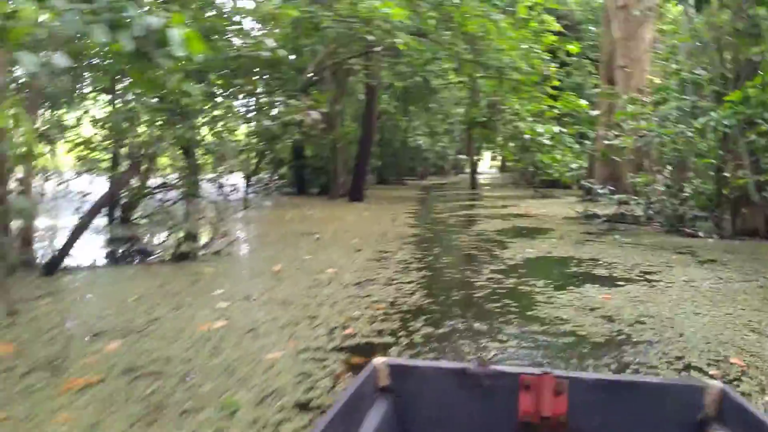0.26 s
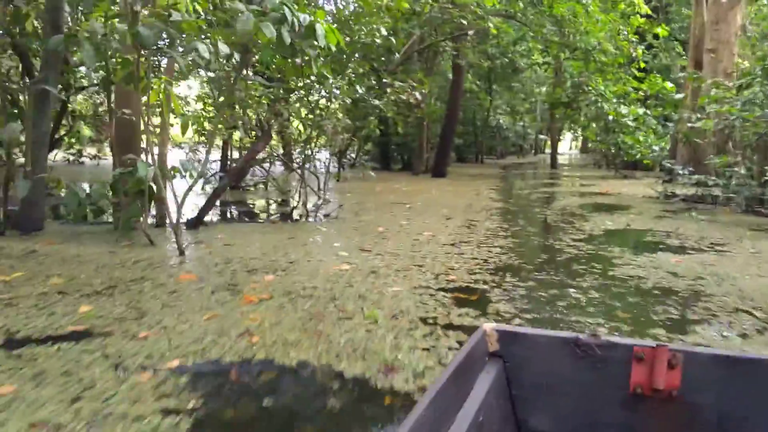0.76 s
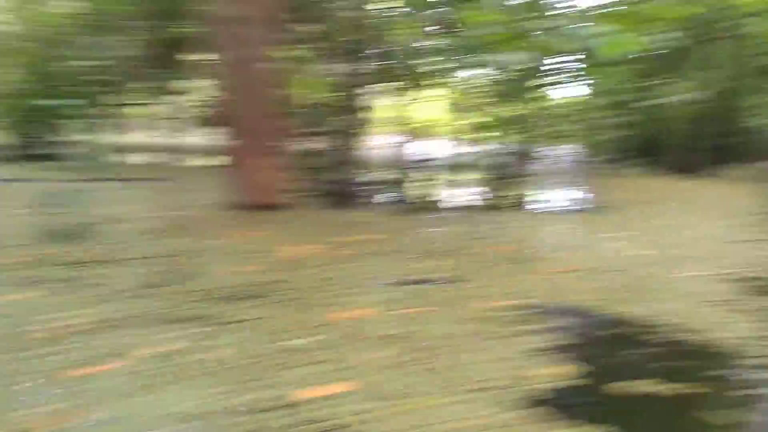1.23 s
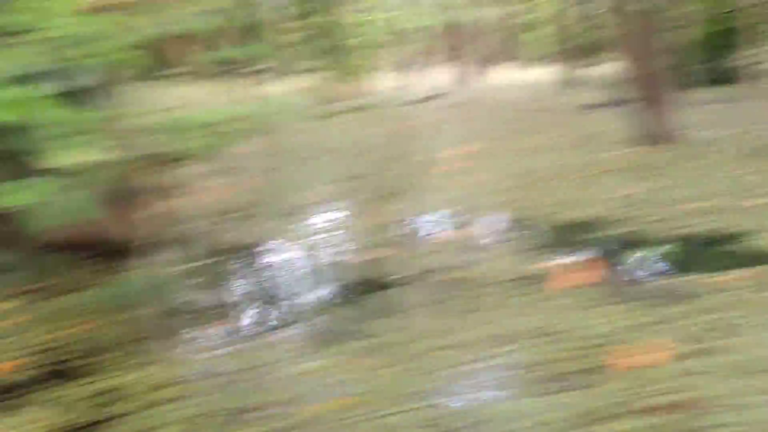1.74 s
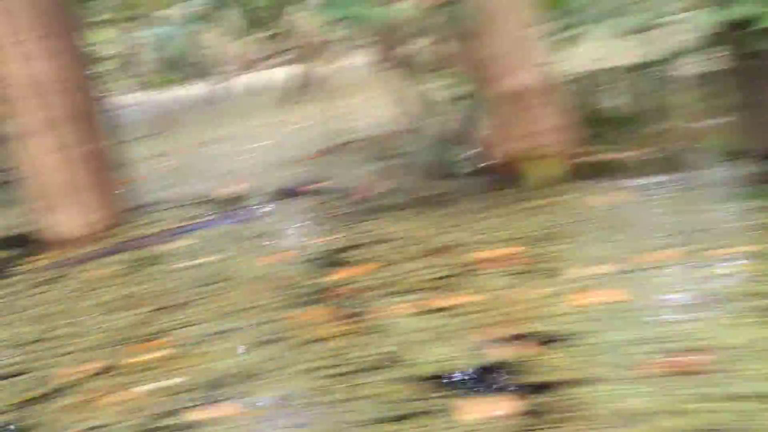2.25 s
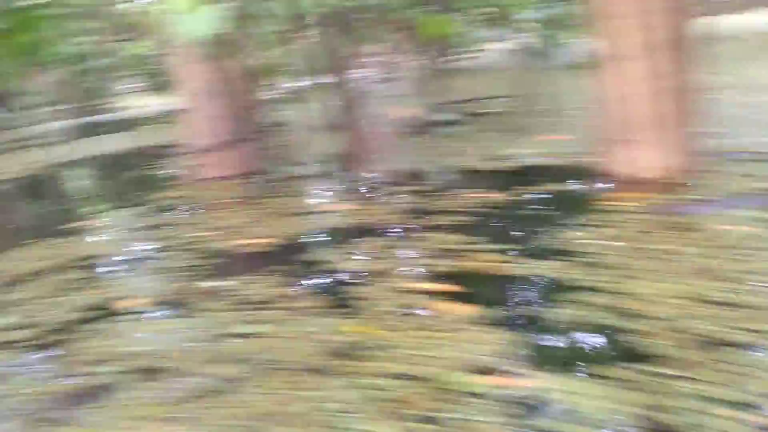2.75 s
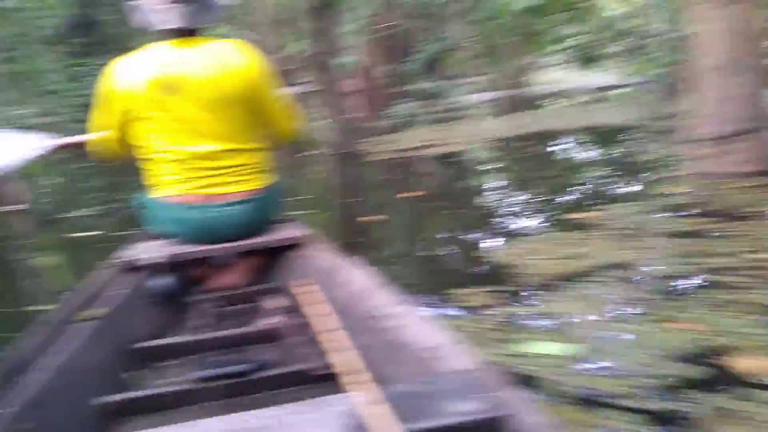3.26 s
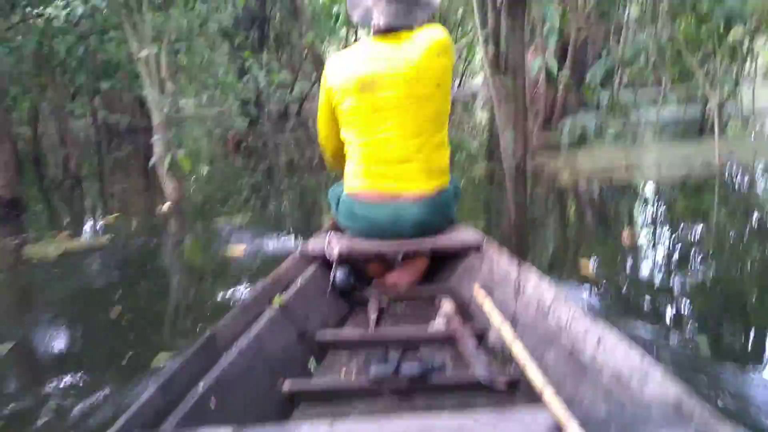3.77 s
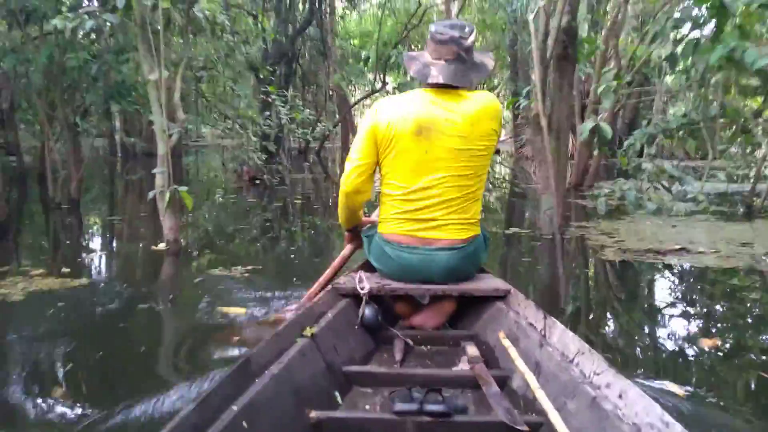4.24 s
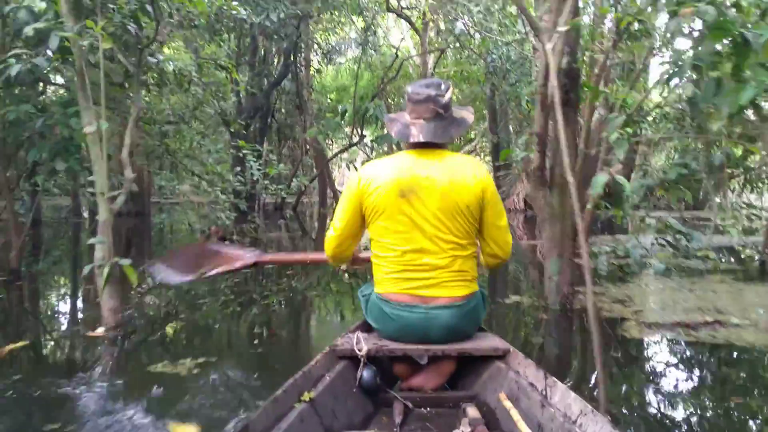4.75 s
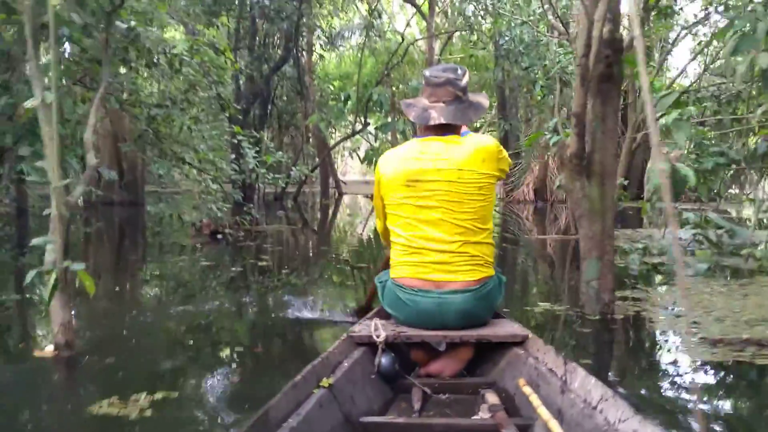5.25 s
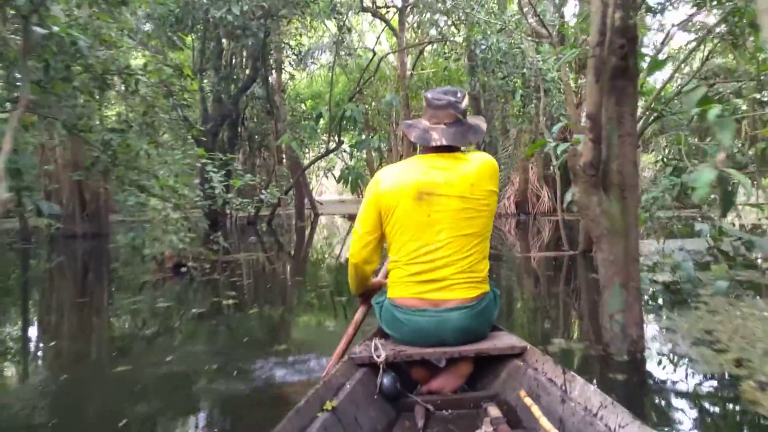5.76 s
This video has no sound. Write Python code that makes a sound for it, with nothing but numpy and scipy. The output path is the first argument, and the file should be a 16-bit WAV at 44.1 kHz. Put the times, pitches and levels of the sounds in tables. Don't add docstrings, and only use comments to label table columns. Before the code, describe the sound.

Water gurgles and drips around a paddled canoe under a steady high cicada drone, with handling taps and two woody knocks.

```python
import sys
import numpy as np
from scipy import signal
from scipy.fft import rfft, irfft, next_fast_len
from scipy.io import wavfile
from scipy.ndimage import uniform_filter1d, map_coordinates

SR = 44100
rng = np.random.default_rng(int(sys.argv[2]) if len(sys.argv) > 2 else 0)


def amplitude_ratio(level_db):
    exponent = np.asarray(level_db, float) / 20
    return 10 ** exponent


def unload_audio(sound):
    columns = np.transpose(np.atleast_2d(sound))
    steps = np.round(np.clip(columns, -1, 1) * 32767)
    wavfile.write(sys.argv[1], SR, steps.astype(np.int16))


N = 264644
TIME = np.arange(N) / SR

# start_s, stir_db, froth_db
STIR = [(0, -53, -56.5), (.3, -46, -61.5), (.45, -51.5, -59), (.82, -48, -57.5), (1, -51.5, -57.5),
        (1.9, -54.5, -59.5), (2.1, -53, -53.5), (2.6, -51.5, -58.5), (2.8, -45, -48), (3.4, -41, -52.5),
        (3.7, -47, -52), (3.95, -38.5, -51.5), (4.29, -45.5, -58), (4.36, -34, -51.5), (4.6, -47, -48.5),
        (5.08, -49, -54), (5.2, -47, -51.5), (6, -49.5, -56)]
# start_s, peak_db, centre_hz, t60_s
SPLASHES = [(0.27, -34, 5950, 0.023), (0.7911, -49, 6000, 0.026), (0.8573, -31.5, 3430, 0.027),
            (2.0026, -31.5, 2720, 0.18), (2.108, -25, 3100, 0.035), (2.5033, -34, 2760, 0.17),
            (2.7145, -40, 2520, 0.085), (2.8147, -35, 3300, 0.02), (3.125, -29, 3100, 0.029),
            (3.2568, -35, 2890, 0.12), (3.347, -25.5, 5430, 0.023), (3.5143, -35, 3240, 0.037),
            (3.557, -27, 3480, 0.088), (3.579, -31, 9000, .01), (3.657, -34, 9700, .008),
            (3.877, -23.5, 8000, 0.0084), (4.0105, -40, 9000, .008), (5.478, -35, 9000, .008),
            (4.773, -31.5, 3400, 0.054), (5.1682, -26.5, 3370, 0.02), (5.269, -34, 3500, 0.042),
            (5.4676, -44, 5170, 0.05), (5.8394, -37, 3200, 0.03)]


def unit(x):
    return x / np.sqrt(np.mean(x ** 2) + 1e-20)


def along(points, hz):
    f, v = np.transpose(points)
    return np.interp(np.log(hz + 1), np.log(f + 1), v)


def curves(rows, t=TIME):
    s, *cols = np.transpose(rows)
    return [np.interp(t, s, c) for c in cols]


def wobble(rate):
    knots = rng.standard_normal(int(N * rate / SR) + 4)
    return map_coordinates(knots, [TIME * rate])


def swells(floor_db, rows):
    t = TIME[::128]
    bells = sum(amplitude_ratio(2 * db) * np.exp(-((t - s) / half) ** 2) for s, db, half in rows)
    return np.sqrt(amplitude_ratio(2 * floor_db) + np.interp(TIME, t, bells))


def filtered(x, response):
    m = next_fast_len(N + 8192)
    return irfft(rfft(x, m) * response(np.fft.rfftfreq(m, 1 / SR)), m)[..., :N]


def add(ports, s, sound):
    i = round(s * SR)
    ports[:, i:i + sound.shape[-1]] += sound[..., :N - i]


def rush(spectrum, alike, patchy_db, grainy_db):
    unevenness = np.minimum(rng.exponential(1, (2, N)), 5)
    grains = amplitude_ratio(grainy_db * unevenness) * rng.standard_normal((2, N))
    z = signal.stft(grains, nperseg=512)[2]
    field = uniform_filter1d(rng.standard_normal(z.shape[1:]), size=5, axis=0)
    field = unit(uniform_filter1d(field, size=4, axis=1))
    a, b = signal.istft(z * amplitude_ratio(patchy_db * field), nperseg=512)[1][:, :N]
    turn = np.arccos(np.clip(alike, -1, 1)) / 2
    pair = np.cos(turn) * a + np.sin(turn) * np.array([b, -b])
    return unit(filtered(pair, lambda hz: amplitude_ratio(along(spectrum, hz))))


def trees(x):
    # pitch_hz, t60_s
    echo_decay = [(300, 0.1), (2000, 0.88), (8000, 0.024)]
    hz, t, z = signal.stft(rng.standard_normal((2, SR // 2)), SR, nperseg=256)
    fade = amplitude_ratio(-60 * t / along(echo_decay, hz)[:, None])
    tail = signal.istft(z * fade, SR, nperseg=256)[1]
    late = np.pad(x, (600, 0))[None]
    return signal.fftconvolve(late, tail / np.linalg.norm(tail[0]), axes=1)[:, :N]


def bubble(db, hz, t60, rise):
    t = np.arange(SR // 8) / SR
    turns = hz * (t + rise * t * t / t60)
    onset = 1 - np.exp(-t / 0.0018)
    return amplitude_ratio(db - 60 * t / max(t60, .005)) * onset * np.sin(2 * np.pi * turns)


def gulp(db, hz, t60, rise):
    out = bubble(db, hz, t60, rise)
    for late, detune, size in rng.random((4, 3)):
        i = int(late ** 2 * 0.47 * t60 * SR)
        neighbour = bubble(db + 2.5 - 8 * size, hz * 1.56 ** (detune - .4), .5 * t60, rise)
        out[i:] += neighbour[:len(out) - i]
    return out


def cicadas():
    # start_s, level_db
    chorus_level = [(0, -35.5), (1, -35.5), (1.7, -37.5), (2.4, -40.5), (3, -43), (3.33, -40.5),
                    (3.7, -42.5), (4.33, -43), (5, -39), (5.33, -41.5), (5.67, -40), (6, -38.5)]
    # pitch_hz, level_db
    body = [(5200, -80), (5900, -26.5), (6500, -3), (6950, 1), (7300, -0.5), (7550, -8.5), (7800, -45),
            (8600, -93)]
    thin_body = [(8700, -60), (9100, 2), (9300, 0.5), (9500, -10), (9900, -27)]  # pitch_hz, level_db
    chorus_db, = curves(chorus_level)
    gates = 0
    for buckles_hz in (84.5, 128.0, 155, 141):
        turns = np.cumsum(buckles_hz * (1 + 0.048 * wobble(19))) / SR
        gates = gates + np.abs(np.sin(np.pi * turns)) ** 6
    chorus = unit((18.0 + gates) * rush(body, alike=0.55, patchy_db=1.2, grainy_db=-1.2))
    swell = amplitude_ratio(chorus_db - .5 + .7 * wobble(9))
    thin = rush(thin_body, alike=0.075, patchy_db=1.0, grainy_db=0.0)
    thin_db = -51.5 - 11 * np.maximum(TIME - 1.7, 0)
    thin_swell = amplitude_ratio(thin_db - 6 + 0.59 * wobble(7.4))
    return swell * chorus * amplitude_ratio([[0], [-13]]) + thin_swell * thin * amplitude_ratio([[0], [-11]])


def rubs():
    # centre_s, peak_db, half_length_s
    shifts = [(0, -50, 0.026), (0.29, -46.5, 0.089), (.6, -53, 0.29), (1.193, -46.5, 0.069),
              (1.397, -54, 0.065), (1.856, -44, 0.035), (2.08, -46.5, 0.067), (2.4, -52, 0.25),
              (2.6, -53, .04), (2.81, -35.5, 0.051), (2.987, -41.5, 0.037), (3.216, -46.5, .04),
              (3.406, -51, 0.037), (3.848, -22.5, 0.032), (3.973, -25.5, 0.093), (4.228, -27, 0.037),
              (5.31, -52, 0.035), (5.9, -51, 0.064)]
    # pitch_hz, level_db (per Hz)
    skin = [(20, -27), (45, 9), (80, -1), (140, 0), (250, -7), (500, -20.5), (1200, -55)]
    lumps = amplitude_ratio(4.0 * np.array([wobble(5.9), wobble(22.055)]))
    rumble = unit(lumps * rush(skin, alike=.1, patchy_db=5.0, grainy_db=-2.5))
    return swells(-58, shifts) * rumble


def gurgle():
    # pitch_hz, level_db (per Hz)
    low_water = [(120, 8), (300, -1), (600, 2), (1000, 0), (1600, -18), (2500, -2), (5000, -99)]
    crowd = np.zeros((2, N))
    for u, p, size, side in rng.random((600, 4)):
        small = bubble(-16 * size, 330 * 3.82 ** p, .025 - 0.018 * p, 0.39)
        add(crowd, u * 5.99, small * amplitude_ratio([[4 * side - 2], [2 - 4 * side]]))
    stirred = 0.7 * rush(low_water, alike=.6, patchy_db=4.5, grainy_db=2.0) + 0.43 * unit(crowd)
    return amplitude_ratio(curves(STIR)[0] - 7.0) * stirred


def froth():
    # pitch_hz, level_db (per Hz)
    fizz_bands = [(900, -1), (1400, 2), (2000, 0.5), (2800, -0.5), (4300, -2.5), (5600, -2.5), (7500, 6.5),
                  (10000, -117)]
    # pitch_hz, level_db (per Hz)
    spray_bands = [(5500, -25), (8000, 0), (10000, -4.5), (12000, -12.5), (14100, -15), (16000, -18)]
    # start_s, right_minus_left_db
    spray_side = [(0, -14), (1.4, -2), (1.9, -11), (2.8, -8), (3.35, -2.5), (3.75, -7), (3.85, -25),
                  (4.3, -14), (4.45, -5.5), (6, -0.5)]
    froth_db = curves(STIR)[1]
    foam = swells(froth_db, [(s, db - 24.5, .04) for s, db, hz, t60 in SPLASHES])
    spray_db = -62 + 0.59 * (froth_db - froth_db.mean())
    mist = swells(spray_db, [(s, db - 30.5, 0.038) for s, db, hz, t60 in SPLASHES])
    foam = foam * amplitude_ratio(0.14 * wobble(25))
    fizz = foam * rush(fizz_bands, alike=0.0073, patchy_db=3.0, grainy_db=3.5) * amplitude_ratio([[.8], [-.8]])
    lean_db = [0 * TIME, curves(spray_side)[0]]
    mist = mist * amplitude_ratio(5.5 + 2.0 * wobble(30) + lean_db)
    return fizz + mist * rush(spray_bands, alike=0.015, patchy_db=2.5, grainy_db=-0.5)


def hull_wash():
    # pitch_hz, level_db (per Hz)
    wash_bands = [(25, -41), (55, 9.5), (90, 8.5), (140, 6), (200, -4), (320, -12.5), (600, -41)]
    return amplitude_ratio(-43.0 - 0.45 * TIME) * rush(wash_bands, alike=0.98, patchy_db=2.0, grainy_db=-0.6)


def bubbles():
    # start_s, peak_db, pitch_hz, t60_s
    pockets = [(0.26, -37, 1065, 0.039), (.262, -41, 680, 0.038), (.278, -42, 465, 0.058),
               (0.354, -34, 263, 0.075), (.52, -45, 824, .04), (.69, -46, 634, 0.042),
               (0.788, -38, 568, 0.055), (.795, -41, 756, 0.059), (0.81, -36, 626, 0.031),
               (.908, -42.5, 1000, 0.036), (1.003, -40.5, 1030, 0.04), (1.415, -39, 370, 0.053),
               (1.539, -37.5, 367, 0.043), (1.595, -32.5, 356, 0.03), (1.691, -37, 350, 0.045),
               (2.055, -40.5, 690, 0.067), (2.151, -37.5, 503, 0.031), (2.286, -43.5, 509, 0.13),
               (2.72, -34.5, 650, 0.068), (2.778, -37.5, 483, 0.07), (3.098, -34, 600, 0.057),
               (3.26, -43.5, 880, 0.05), (3.414, -39, 660, 0.05), (3.612, -34, 1350, 0.027),
               (3.766, -33, 414, 0.028), (4.327, -49, 930, 0.087), (4.365, -22, 694, 0.039),
               (4.398, -30, 880, 0.023), (4.468, -32, 497, 0.091), (4.499, -33, 646, 0.056),
               (4.576, -39, 1060, 0.076), (4.6, -40, 596, .04), (4.755, -42, 493, .05),
               (4.785, -42, 1156, .04), (4.891, -39, 500, .04), (4.641, -34, 840, 0.062),
               (4.7018, -31, 990, 0.035), (4.99, -33.5, 934, 0.06), (5.228, -37.5, 1290, 0.038),
               (5.247, -29.5, 250, 0.062)]
    out = np.zeros((2, N))
    for s, db, hz, t60 in pockets:
        add(out, s, gulp(db - 3.5, hz, t60, 0.098) * amplitude_ratio(rng.normal(0, 0.81, (2, 1))))
    return out


def splashes():
    out, t = np.zeros((2, N)), np.arange(SR // 8) / SR
    for s, db, hz, t60 in SPLASHES:
        band = signal.butter(1, [hz / 1.7, min(hz * 3.2, 18000)], "band", fs=SR)
        burst = unit(signal.lfilter(*band, rng.standard_normal((2, len(t)))))
        shape = amplitude_ratio(db - 9.5 - 60 * t / max(t60, .003)) * (1 - np.exp(-t / 0.00065))
        add(out, s, shape * burst * [[1], [.6]])
    return out


def frog():
    # start_s, level_db, length_s
    peeps = [(.3, -60, .03), (.37, -59, .025), (.69, -54, .025), (.73, -58, .03), (.81, -63, .03),
             (1.582, -53, .02), (2.608, -41, .025), (2.947, -51, .025), (3.71, -58, .04), (4.22, -63, .03),
             (4.69, -60, .02), (4.745, -59, .03), (5.725, -57, .025)]
    dry, t = np.zeros((1, N)), np.arange(SR * 3 // 4) / SR
    for s, db, length in peeps:
        shape = np.clip(t / .004, 0, 1) * amplitude_ratio(-np.maximum(t - length, 0) * 1500 - 300 * t)
        pitch_hz = 4150 + rng.normal(0, 25) - 500 * t
        add(dry, s, amplitude_ratio(db + 5) * shape * np.sin(2 * np.pi * pitch_hz * t))
    later = filtered(dry[0], lambda hz: np.exp(-2j * np.pi * hz * .00004))
    return 1.7 * np.array([dry[0], 0.55 * later]) + amplitude_ratio(-8) * trees(dry[0])


def bird():
    # start_s, pitch_hz, level_db
    whistle = [(0, 2230, -66), (.022, 2310, -47.5), (.06, 2140, -49), (.11, 2055, -50), (.3, 2030, -52),
               (.4, 1990, -55), (.5, 1920, -63), (.6, 1750, -69), (.7, 1660, -82)]
    # start_s, level_db, right_lag_ms, right_share
    calls = [
        (.385, -1, .1, .5),
        (5.3, 4, 0, .5),
    ]
    out, t = np.zeros((2, N)), np.arange(SR * 3 // 4) / SR
    hz, level_db = curves(whistle, t)
    for s, db, lag_ms, share in calls:
        turns = np.cumsum(hz) / SR - hz * [[0], [lag_ms / 1000]]
        add(out, s, amplitude_ratio(level_db + db) * np.sin(2 * np.pi * turns) * [[1], [share]])
    out *= amplitude_ratio(1.1 * wobble(45))
    return 1.7 * out + amplitude_ratio(-8) * trees(out[0])


def taps():
    # start_s, peak_db, width_ms, rebound_share, thump_db
    left_taps = [
        (2.049, -29.5, 0.46, .2, -35),
        (2.253, -41, 0.56, .2, -28),
        (2.364, -39, 0.58, .2, -28),
        (2.5259, -10.5, 0.35, 0.11, -7.5),
        (2.6399, -28.5, 0.66, 0.16, -24),
        (2.9786, -11, 0.06, 0.24, -52),
        (3.14, -17.5, 0.071, 0.38, -31),
    ]
    # start_s, peak_db, width_ms, rebound_share, thump_db
    right_taps = [(3.4548, -15.5, 0.17, 0.052, -26), (3.8027, 1.2, 0.12, 0.13, -19),
                  (3.953, -20, 0.092, 0.53, -34), (3.9536, -10, 0.12, 0.83, -26),
                  (3.958, -13.5, 0.22, 0.44, -20), (4.0094, -7, 0.091, 0.15, -7.5),
                  (4.012, -10.5, 0.13, 0.18, -35), (4.074, -29, .1, 0.37, -39),
                  (4.162, -32, 0.074, .3, -28), (4.189, -29, .06, 0.34, -36),
                  (4.302, -27, 0.097, 0.27, -38), (4.509, -32, 0.35, .2, -35),
                  (5.5967, -10, 0.057, 0.39, -56), (5.641, -9, 0.09, 1, -56)]
    leak = .01
    out = np.zeros((2, N))
    ms = np.arange(SR // 16) / SR * 1000 - 2
    rows = [(leak, *row) for row in left_taps] + [(1 - leak, *row) for row in right_taps]
    for right, s, db, width, rebound, thump_db in rows:
        push = np.exp(-np.abs(ms / width / 0.64) ** 1.22)
        push -= rebound * np.exp(-.5 * (ms / width - 2.2) ** 2)
        nail = (ms > -.1) * np.exp(-np.abs(ms) / 0.091) * rng.standard_normal(len(ms))
        push += 0.085 * nail * 0.13 / width
        after = np.maximum(ms - width, 0) / 1000
        thump = amplitude_ratio(thump_db - 60 * after / 0.023) * np.sin(2 * np.pi * 135 * after)
        add(out, s - .002, (thump - amplitude_ratio(db) * push) * [[1 - right], [right]])
    return out


def drips():
    # start_s, peak_db, pitch_hz, t60_s, left_minus_right_db
    drops = [(2.372, -40, 1870, 0.043, 20), (2.83, -16, 268, 0.097, 4), (2.841, -29, 1500, 0.013, 21),
             (2.862, -29.5, 990, 0.039, 2), (3.312, -48, 2150, .03, 11), (3.317, -33.5, 1550, 0.044, 21),
             (3.411, -28.5, 1450, 0.028, 24), (3.454, -31.5, 1600, 0.052, 24), (4.644, -20, 1360, 0.027, 3),
             (4.703, -45, 945, 0.027, 3), (4.97, -40, 2390, 0.11, 10), (5.091, -46, 1880, 0.2, 21),
             (5.437, -31.5, 3250, 0.022, 13), (5.404, -27, 1180, 0.02, 11), (5.458, -36.5, 1250, .04, 13),
             (5.488, -34, 3000, .02, 9), (5.522, -36, 3150, .025, 8), (5.61, -32, 2940, .012, 6)]
    out = np.zeros((2, N))
    for s, db, hz, t60, left_db in drops:
        rise = 0.054 * (1e3 / hz) ** 1.35
        add(out, s, bubble(db - 11.0, hz, t60, rise) * amplitude_ratio([[left_db / 2], [-left_db / 2]]))
    return out


def knocks():
    # start_s, blow_db, low_mode_db
    blows = [
        (3.5398, -13, -3),
        (5.157, -15.5, -3),
    ]
    # pitch_hz, level_db, t60_s
    hull_modes = [(604, -8, 0.031), (900, -5.5, 0.024), (1020, -5.5, 0.023), (1290, -2, 0.014),
                  (1500, -6, 0.011), (2150, -2.5, 0.079), (2980, -25, 0.039)]
    out, t = np.zeros((2, N)), np.arange(SR // 6) / SR
    for s, db, low_db in blows:
        modes = hull_modes + [(472, low_db + 0.5, 0.024)]
        ring = sum(amplitude_ratio(level - 60 * t / t60) * np.sin(2 * np.pi * hz * t) for hz, level, t60 in modes)
        contact = np.sin(2 * np.pi * 1100 * t) + 0.28 * rng.standard_normal(len(t))
        snap = 4.85 * amplitude_ratio(-60 * t / 0.0027) * contact
        give = 1 - np.exp(-t / 0.00019)
        add(out, s, amplitude_ratio(db - 10.5) * (ring + snap) * give * [[1.1], [.9]])
    return out + amplitude_ratio(-26) * trees(out[0])


def scene():
    water = gurgle() + froth() + hull_wash() + bubbles() + splashes() + drips()
    return cicadas() + rubs() + water + frog() + bird() + taps() + knocks()


def low_pass(x):
    return signal.sosfilt(signal.butter(12, 16800, fs=SR, output="sos"), x)


def record(dry):
    # pitch_hz, share_from_other_port
    cross = [(40, .9), (300, .95), (1100, .94), (2100, .99), (4500, .985), (5600, .92), (7000, .5),
             (9500, .1)]
    # pitch_hz, level_db
    top_band = [(14000, 0), (14300, -3), (14550, -22), (17000, -24)]
    # start_s, drop_db
    ducks = [
        (2.527, 1),
        (3.804, 18),
        (5.597, 4.5),
        (5.641, 1),
    ]
    port_lag, clip_level = 1 / 2180, 1.1

    def crossfeed(hz):
        return np.clip(along(cross, hz), 0, 1) * np.exp(-2j * np.pi * hz * port_lag)

    wide = dry - filtered(dry[::-1], crossfeed)
    wide = wide / (1 + np.abs(wide / clip_level) ** 8) ** (1 / 8)
    wide = filtered(wide, lambda hz: amplitude_ratio(along(top_band, hz)))
    duck_db = sum(db * np.exp(-np.maximum(TIME - s, 0) / 0.4) * (TIME > s) for s, db in ducks)
    return low_pass(wide * amplitude_ratio(-duck_db))


dry = scene()
out = record(dry)
unload_audio(out)
```